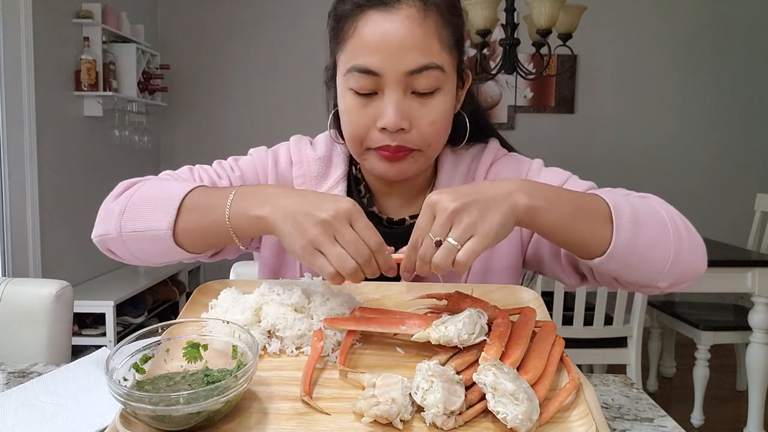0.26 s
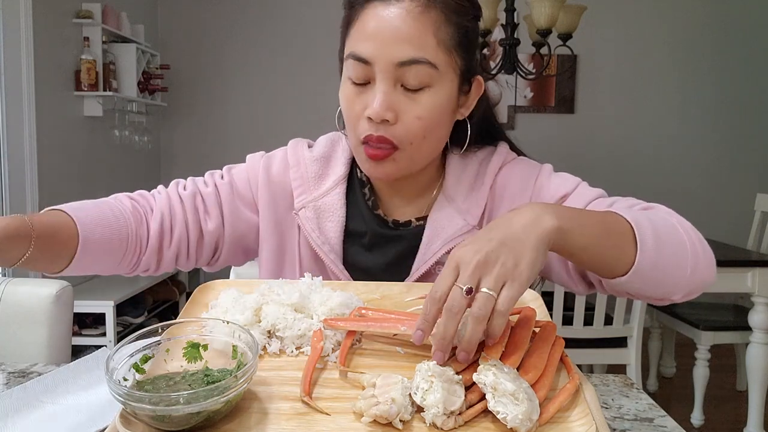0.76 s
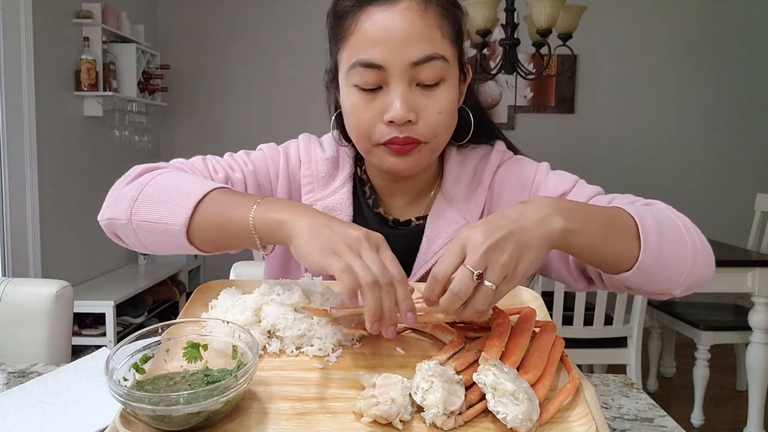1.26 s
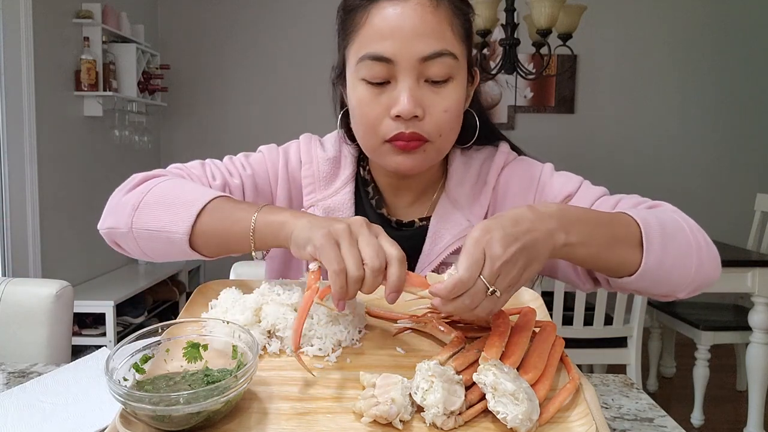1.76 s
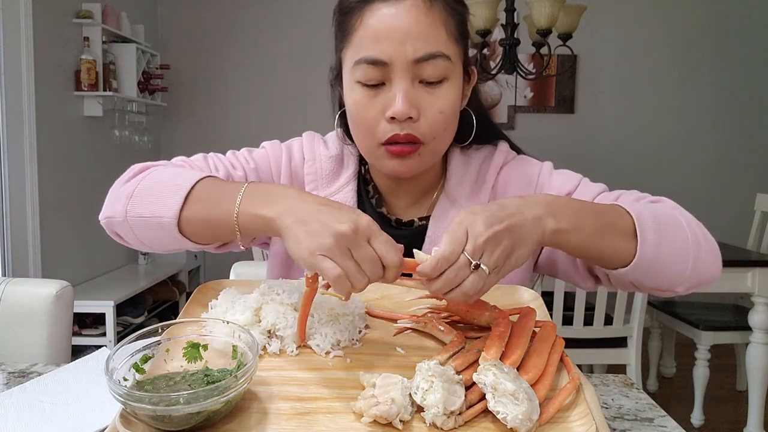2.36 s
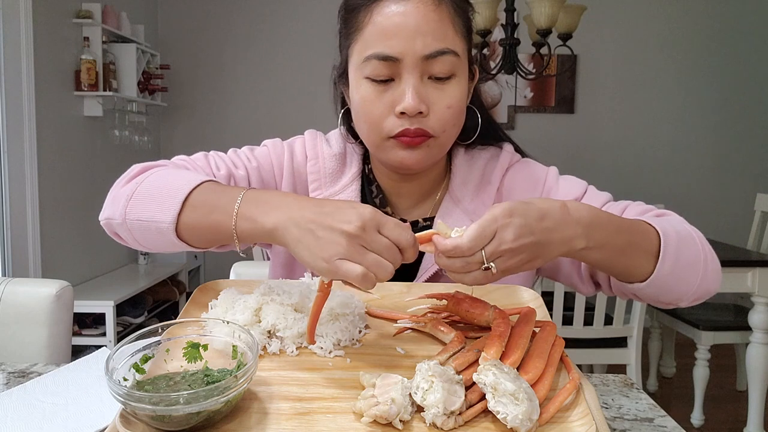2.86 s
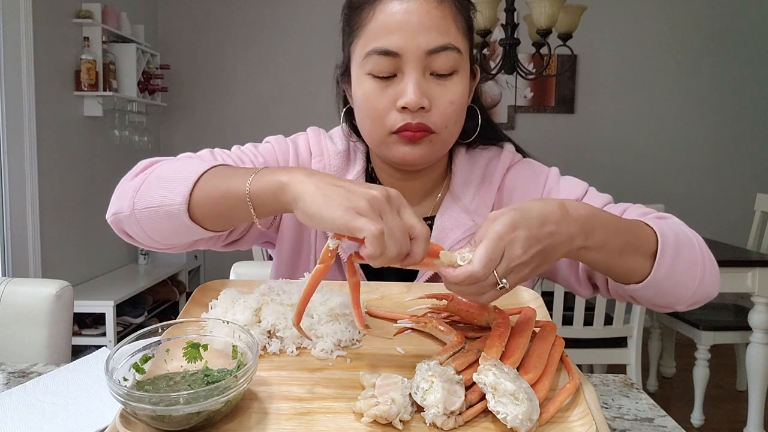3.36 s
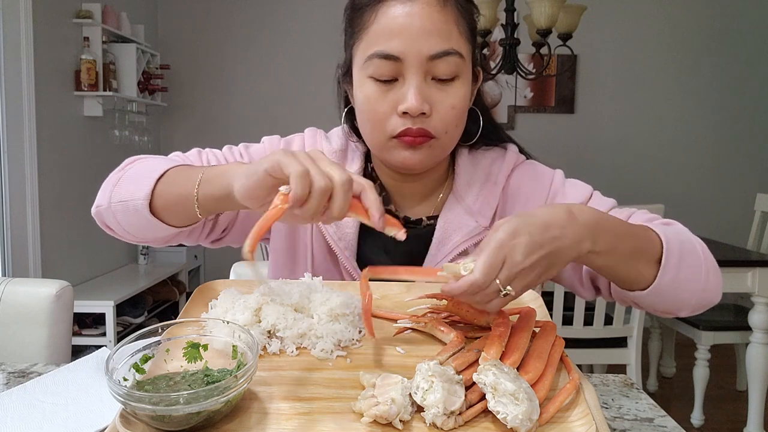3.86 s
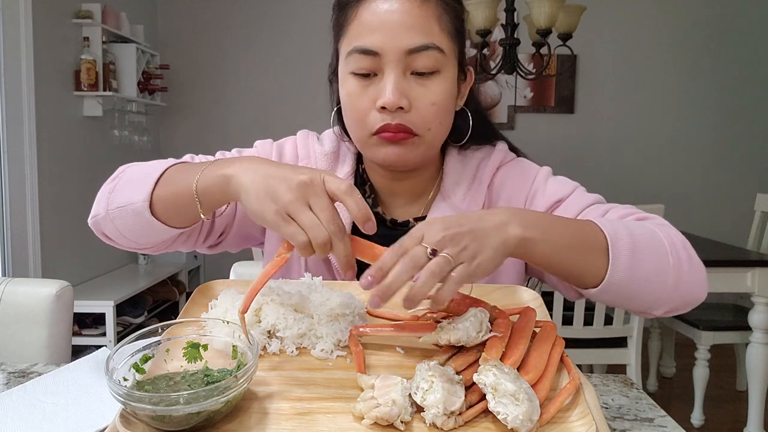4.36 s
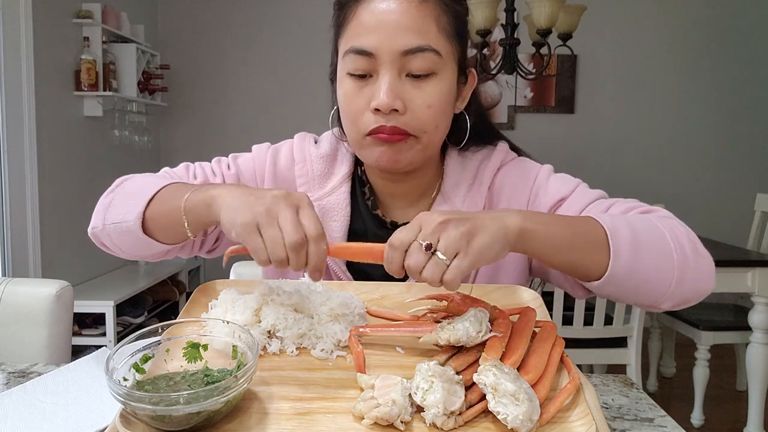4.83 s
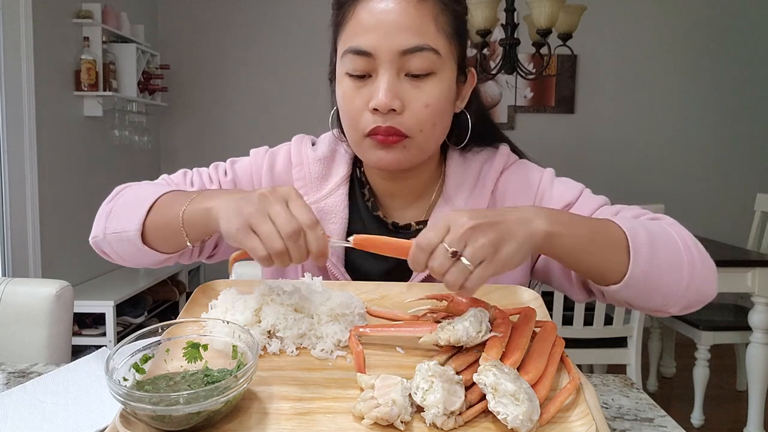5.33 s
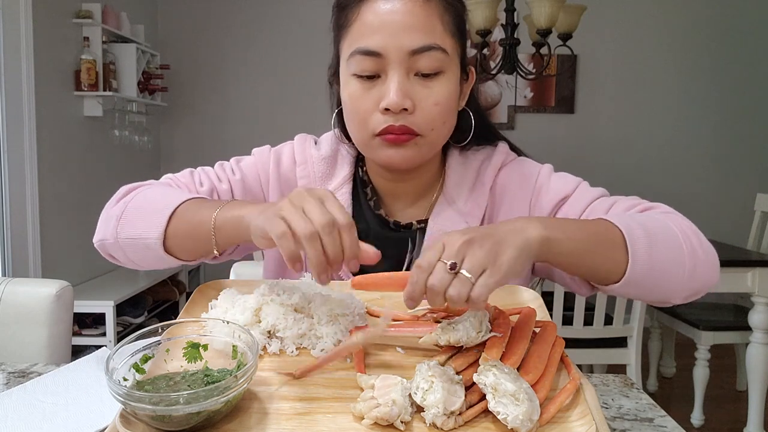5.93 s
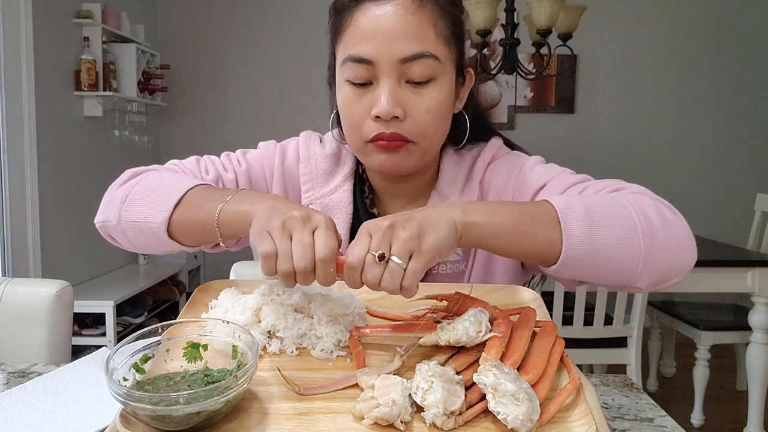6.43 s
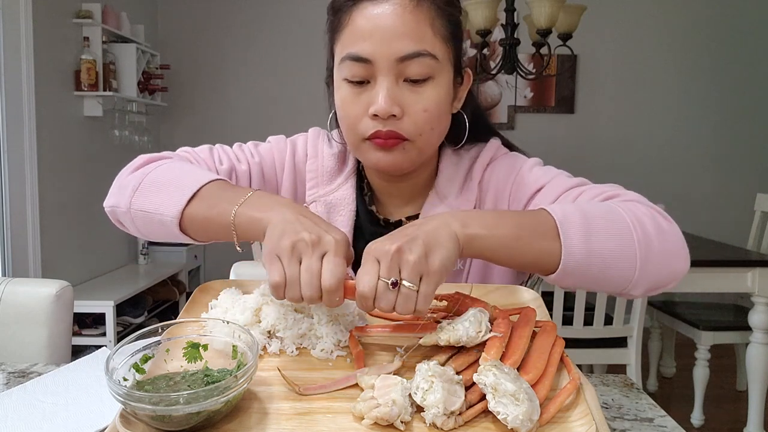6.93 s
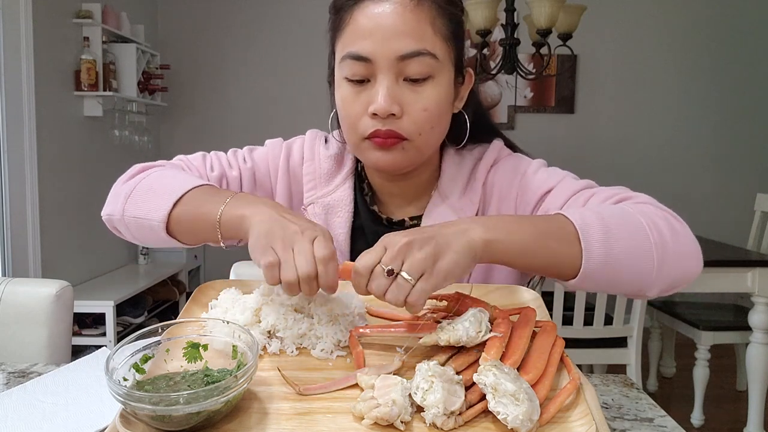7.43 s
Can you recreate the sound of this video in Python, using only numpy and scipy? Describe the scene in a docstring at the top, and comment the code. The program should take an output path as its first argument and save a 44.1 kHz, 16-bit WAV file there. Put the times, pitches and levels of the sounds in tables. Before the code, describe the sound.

A phone near the hands picks up dry, bright shell cracks, short crunches, hollow joint pops and faint finger ticks, with woody thuds and scrapes as pieces meet the board. Events are irregular, with near-silent gaps. A dish tings briefly around one second; the loudest crack comes close to the end. The small hard room adds a short bright reverberation over soft steady rumble.

```python
"""Crab legs snapped over a board

Cooked crab legs are snapped by hand over a wooden board, close to a phone in a quiet dining room.
Shell crunches, cracks, pops and finger ticks are short noise bursts, each with its own colour.
Knocks, scrapes and a ringing dish are decaying modes; short decaying tones colour the loudest snap.
A room built of noise answers them, and shaped noise makes the soft rumble of the house."""
import sys
import numpy as np
from scipy import signal
from scipy.fft import rfft, irfft
from scipy.io import wavfile
from scipy.ndimage import uniform_filter1d

SR = 44100
rng = np.random.default_rng(int(sys.argv[2]) if len(sys.argv) > 2 else 0)


def digitize_waveform(pressure):
    """Quantize a signal to 16-bit integers and store it at the path in sys.argv[1].

    Rows of a 2-D input are taken as channels; values are limited to [-1, 1].
    """
    field = np.atleast_2d(pressure).T
    bounded = np.clip(field, -1, 1)
    quanta = np.round(bounded * 32767).astype(np.int16)
    wavfile.write(sys.argv[1], SR, quanta)


N = 339129  # length of the scene (samples)

# Still air of the house. Each row: frequency in Hz, relative density in dB per Hz.
AIR_COLOUR = [(15, -39.5), (25, -6.5), (55, -5.5), (80, -16), (102, -3), (161, -5), (185, -2.5), (212, -3),
              (344, -7), (394, -6.5), (641, -12), (2690, -31), (3820, -32), (4140, -30.5), (16000, -51)]
# Walls and ceiling. Each row: frequency in Hz, early energy in dB, early T60 in seconds,
# late energy in dB, late T60 in seconds.
ROOM_BANDS = [(150, -6, 0.07, -19, 0.4), (676, -6.5, 0.067, -3, 0.22), (1830, 2.5, 0.078, -7, 0.74),
              (3600, -1, 0.19, -12.5, 0.81), (8600, -6, 0.11, -16, 0.48), (15000, -4.5, .15, -15.5, 0.13)]
# Colour common to all shell. Each row: frequency in Hz, gain in dB.
SHELL_COLOUR = [(30, -27), (100, -21.5), (400, -14.5), (800, -5), (1500, -10.5), (2300, -4), (3100, -1),
                (4400, 0), (5700, 0.5), (6700, -3), (8200, 3), (10500, -7), (15000, -5), (16500, -18.5)]
# Shell tearing or rubbing on shell. Each row: start in seconds, length in seconds, rms level in dB,
# brightness in dB per octave, strength of the hollow's resonance in dB.
CRUNCHES_HEARD = [(0.015, 0.052, -67.5, -10, 7), (0.667, 0.07, -73, -8, 7), (1.921, 0.18, -59, -0.5, 4),
                  (2.092, 0.034, -42.5, -3.5, -0.5), (2.52, .03, -57.5, 4, 5),
                  (3.561, 0.065, -55.5, 3.5, 10), (4.828, .12, -52.5, 2, -4), (5.311, 0.076, -66, -3.5, 18)]
# The board with its load of legs. Each row: mode in Hz, strength in dB, T60 in seconds.
BOARD_MODES = [(64, -10, 0.1), (125.5, -15, 0.077), (209, -13, 0.09), (292, -2, .06), (328.4, -6, 0.1),
               (430, 2, 0.018), (582.2, -1, 0.058), (773, -2.5, .04), (1152, -6, .04), (1384, -1.5, 0.048),
               (1435, -6.5, 0.12), (1970, -4, 0.053), (2074, -0.5, 0.12)]
# Shell meeting the board; at 7.035 s the low thump and body of the big snap. Each row: start in seconds,
# thud energy in dB, favoured pitch in Hz, clack energy in dB.
THUDS_AND_CLACKS = [(0.063, -28.5, 394, -36.5), (.918, -25, 152, -25.5), (1.322, -37, 370, -47),
                    (1.447, -35, 706, -43), (3.959, -44, 396, -30), (3.9971, -21, 373, -24.5),
                    (4.011, -3.5, 315, -5), (4.271, -41, 504, -25.5), (4.2826, -11.5, 250, -42),
                    (4.292, -28, 75.2, -36), (5.903, -21, 920, -24), (5.9541, -29, 496, -28),
                    (5.976, -25.5, 447, -39), (6.0218, -4.5, 400, -18.5), (6.073, -18.5, 694, -35),
                    (7.035, -18, 111, -19), (7.0355, -8, 810, -11.5)]
# Shell giving way, and at 0.92 s the clack of something set down or dropped. Each row: start in seconds,
# energy in dB, lead of the small clicks ahead of it in seconds, resonance in Hz, resonance strength in dB,
# brightness in dB per octave.
CRACKS_AND_CLACK = [(0.873, -35.5, .001, 4970, 7, -6), (0.9192, -12, .002, 3800, 1, -1.5),
                    (1.306, -35.5, .001, 5070, 4, -0.5), (1.7058, -22, 0.0013, 7450, 6.5, -1),
                    (1.7641, -14.5, 0.00073, 7200, 15, -2), (1.781, -16.5, 0.0037, 4200, 6, -1.5),
                    (1.8975, -21, 0.00089, 7450, 8, 2), (1.922, -13, 0.00085, 7630, 4, 5),
                    (1.973, -26.5, 0.0037, 3236, 5, -6.5), (2.1142, -1, 0.015, 4380, 3, 7),
                    (2.538, -26.5, .012, 5540, 29, -1), (2.5484, -22, .001, 5620, 1, 0.5),
                    (2.9521, -22, 0.0039, 4200, -1, -0.5), (3.0786, -12.5, 0.014, 2460, -5.5, 2),
                    (3.596, -22.5, 0.019, 4950, 17.5, -1.5), (3.627, -19, 0.00092, 4700, 2, -4),
                    (4.849, -12.5, 0.0042, 7210, -4, 1.5), (4.855, -21.5, .001, 2290, 4, 3),
                    (4.922, -8, 0.0035, 2910, -6, 5.5), (5.34, -35, .002, 4700, 23, -5.5),
                    (5.9, -9.5, 0.0011, 6430, 10.5, -4), (7.0336, 9.5, 0.00096, 3650, 6.5, 4),
                    (7.0385, 0, 0.00089, 3430, 5.5, -3)]
# Scraps landing in a dish. Each row: start in seconds, ring energy in dB, favoured pitch in Hz.
DISH_DROPS = [(0.917, -16, 2450), (0.9818, -15.5, 4170)]
# The dish. Each row: mode in Hz, strength in dB, T60 in seconds.
DISH_MODES = [(2170, 1, .08), (2290, 6.5, 0.085), (2360, -17, .5), (2444, -1, 0.059), (4020, 5, .06),
              (4114, 10, 0.065), (4210, 12, 0.056), (4310, 11, .07), (4420, 5, .09), (4343, -12, 0.5)]
# Fingers shifting their grip on the shell. Each row: start in seconds, end in seconds.
GRIP_SHIFTS = [(1.36, 1.68), (2.7, 2.94), (3.501, 3.57), (5.32, 5.6), (7.469, 7.5)]
# Hollow segments popping as a joint parts. Each row: start in seconds, energy in dB,
# pitch of the hollow in Hz.
JOINT_POPS = [(1.972, -19.5, 2124), (2.2405, -27.5, 2060), (3.578, -34, 2400), (3.597, -24.5, 2380),
              (3.6268, -21.5, 2180), (4.852, -25.5, 2133)]
# Shell dragged over the board. Each row: start in seconds, length in seconds, rms level in dB,
# favoured pitch in Hz.
BOARD_SCRAPES = [(2.131, .046, -53, 482.7), (4.029, 0.077, -50, 590), (4.198, 0.087, -53, 570),
                 (4.273, .04, -44, 312), (4.582, 0.21, -70, 362), (5.92, 0.15, -56, 475),
                 (6.029, 0.17, -58.5, 560)]
# Fine colour of the loudest snap: short decaying tones, mostly 3 to 5 kHz.
# Each row: tone in Hz, strength in dB, T60 in seconds.
SNAP_TONES = [(3040, -8.5, .06), (3170, -2.5, .05), (3370, 2, 0.095), (3516, 3.5, 0.053), (3500, -1, 0.043),
              (3780, -7, .05), (4300, 1, 0.025), (4830, -1, .05), (4980, -3.5, 0.028), (5060, 4.5, 0.1),
              (4970, -1.5, 0.074), (5330, -7, 0.047), (8500, -3, 0.027)]

AIR_DB = -69  # rms of the rumble, left and right averaged
TOP_HZ = 16500
GRAIN_SIZE, PORT_LAG = 4096, 2  # length of one crack, lead of the left microphone port (samples)
SLIPS_PER_S = 1100
# two small clicks run ahead of each crack, the second nearer to it and slightly weaker
SPLINTER_COUNT, SPLINTER_DB, SPLINTER_STEP_DB, SPLINTER_CLOSING = 2, -14, -0.5, .7
POP_Q, POP_LEAK_DB = 4.5, -34
# every clack in the thud table has the same dull shell colour, and its hard edge rings upper board modes
CLACK_HZ, CLACK_RING_DB, CLACK_TILT_DB = 6800, 3.5, -8.5
EDGE_HZ, EDGE_DB = 1900, -4.5  # EDGE_DB is relative to the clack
TICKS_PER_S, TICK_DB, TICK_SPREAD_DB, TICK_HZ = 9, -46, 7.5, 5207
DROP_CLICK_DB = -6.5  # the scrap's own click, against the ring of the dish
SNAP_S, SNAP_TONES_DB = 7.034, 3  # when the loudest snap's tones start, and their energy together
# what each source sends to the room, against its straight sound (dB)
SHELL_ROOM_DB, BOARD_ROOM_DB, DISH_ROOM_DB, SNAP_ROOM_DB = 3, -1.5, 2, -7


def undb(db):
    """Decibels to gain."""
    return 10 ** (np.asarray(db) / 20)


def unit(x):
    """Scale to an energy of one in each channel."""
    return x / np.sqrt(np.sum(x ** 2, axis=-1, keepdims=True))


def decay(t, t60):
    """Exponential decay that falls by 60 dB in t60 seconds."""
    return np.exp(-np.log(1000) * t / t60)


def freqs(size):
    """Frequencies of the bins of a spectrum, kept above zero."""
    return np.maximum(np.fft.rfftfreq(size, 1 / SR), 1)


def curve(points, hz):
    """Read (Hz, value) points on a log-frequency axis."""
    f, value = np.transpose(points)
    return np.interp(np.log(hz), np.log(f), value)


def causal(gain):
    """The frequency response with this gain that rings after a blow, never before."""
    cepstrum = irfft(np.log(gain + 1e-9))
    half = len(cepstrum) // 2
    cepstrum[1:half] *= 2
    cepstrum[half + 1:] = 0
    return np.exp(rfft(cepstrum))


def resonance(hz, centre_hz, q):
    """Response of a simple resonator, with a gain of one at its centre."""
    return 1 / (1 + 1j * q * (hz / centre_hz - centre_hz / hz))


def add(out, s, x):
    """Mix a sound in at time s."""
    start = max(int(s * SR), 0)
    out[:, start:start + x.shape[-1]] += x[..., :N - start]


def pair(size, likeness):
    """Left and right noise that are partly alike."""
    shared = np.sqrt(likeness) * rng.standard_normal(size)
    return shared + np.sqrt(1 - likeness) * rng.standard_normal((2, size))


def even(x, size):
    """Level the broad humps of a random burst's spectrum and keep its fine ripple."""
    spectrum = rfft(x)
    power = uniform_filter1d(np.abs(spectrum) ** 2, size, axis=-1)
    return spectrum * np.array([causal(np.maximum(p, 1e-12) ** -.5) for p in power])


def spread(mid, side, hz, apart_hz):
    """Left and right spectra: long waves reach both ports more alike than short ones."""
    side = side * np.minimum(0.28 + hz / apart_hz, 1)
    return np.array([mid + side, mid - side])


def air():
    """Soft steady rumble of the house: wide noise shaped by the colour of the air."""
    hz = freqs(N)
    mid, side = rfft(rng.standard_normal((2, N)))
    noise = irfft(spread(mid, side, hz, apart_hz=1530) * undb(curve(AIR_COLOUR, hz)), N)
    return noise * undb(AIR_DB) / np.std(noise.mean(axis=0))


def room(first_s=0.0037):
    """Surfaces answer after a few milliseconds: early and late noise decays, set band by band."""
    size = 2 ** 15
    t, hz = np.arange(size) / SR, freqs(size)
    mid, side = even(rng.standard_normal((2, size)), size=200) * np.sqrt(size)
    noise = spread(mid, side, hz, apart_hz=1800)
    log_centres = np.log(np.array(ROOM_BANDS)[:, 0])
    out = np.zeros((2, size))
    for share, (_, early_db, early_t60, late_db, late_t60) in zip(np.eye(len(ROOM_BANDS)), ROOM_BANDS):
        weight = np.interp(np.log(hz), log_centres, share)  # neighbouring bands crossfade
        band = irfft(noise * weight) / np.sqrt(2)
        early = undb(early_db) * unit(decay(t, early_t60))
        late = undb(late_db) * unit(decay(t, late_t60))
        out += band * np.hypot(early, late)
    return np.pad(out, ((0, 0), (int(first_s * SR), 0)))


def piece(ring_hz, ring_db, tilt_db):
    """Response of one piece of shell: thin pieces are bright, wet ones dull, and each has a resonance."""
    hz = freqs(GRAIN_SIZE)
    tilt = tilt_db * np.log2(np.clip(hz, 1000, TOP_HZ) / 4000)
    colour = undb(curve(SHELL_COLOUR, hz) + tilt)
    # only the size of Q shapes the gain: the resonance is broadest near 9 dB and narrows either side
    q = 4.7 - 0.5 * max(ring_db, 0)
    return causal(colour * np.abs(1 + undb(ring_db) * resonance(hz, ring_hz, q)))


def crack(response, run_s=.0012, after_db=-17, after_s=0.003, likeness=0.46):
    """A fracture runs through the shell in about two milliseconds, with a faint splintery tail."""
    t = np.arange(GRAIN_SIZE) / SR
    envelope = np.sqrt(t) * (np.exp(-(t / run_s) ** 2) + undb(after_db) * np.exp(-t / after_s))
    burst = even(pair(GRAIN_SIZE, likeness) * envelope, size=90)
    return unit(irfft(burst * response))


def slips(length_s, spread_db):
    """Random tiny slips of unequal size that swell and die away."""
    size = int(length_s * SR)
    happens = rng.random(size) < SLIPS_PER_S / SR
    happens[size // 2] = True  # at least one slip
    strength = rng.standard_normal(size) * undb(spread_db * rng.standard_normal(size))
    return happens * strength * np.sqrt(np.hanning(size))


def rubbed(length_s, spread_db, grain):
    """Repeat a grain at every slip, at an rms of about one over the stated length."""
    fibres = slips(length_s, spread_db)
    return unit(signal.fftconvolve(fibres[None], grain)) * np.sqrt(length_s * SR)


def struck(modes, favoured_hz, q, scatter, reach):
    """Decaying tones, those within a factor `reach` of one pitch favoured, as a contact's softness does."""
    t = np.arange(int(.7 * SR)) / SR
    out = np.zeros((2, len(t)))
    for hz, db, t60 in modes:
        hz = hz * (1 + scatter * rng.standard_normal())
        lag = rng.standard_normal((2, 1)) * min(hz / 3000, 1)  # high tones reach the two ports out of step
        size = undb(db) * np.abs(resonance(favoured_hz, hz, q)) ** 2
        sign = rng.choice([-1, 1])  # each tone starts either way up
        out += sign * size * np.cos(2 * np.pi * hz * t + lag) * decay(t, t60)
    edges = [favoured_hz / reach, min(favoured_hz * reach, TOP_HZ)]
    contact = signal.butter(2, edges, "band", fs=SR, output="sos")
    return unit(signal.sosfilt(contact, out))


def shell_hit(s, db, response, gathered_db=3):
    """One click as (s, straight, to the room); the room gathers it from all sides, smoothing its spectrum."""
    sound = crack(response)
    smooth = unit(irfft(response))
    gathered = unit(sound + undb(gathered_db) * smooth)
    return s, undb(db) * sound, undb(db + SHELL_ROOM_DB) * gathered


def placed(s, db, sound, room_db):
    """Any other sound as (s, straight, to the room)."""
    return s, undb(db) * sound, undb(db + room_db) * sound


def crunching():
    """Twisted or rubbed shell gives way in many tiny slips, each a small crack."""
    for s, length_s, db, tilt_db, hollow_db in CRUNCHES_HEARD:
        grain = crack(piece(1500, hollow_db, tilt_db))
        yield placed(s, db, rubbed(length_s, spread_db=4, grain=grain), room_db=0)


def thudding_and_clacking():
    """Pieces thud and clack on the board; the same modes and click give the big snap its thump and body."""
    clack = piece(CLACK_HZ, CLACK_RING_DB, CLACK_TILT_DB)
    for s, thud_db, hz, clack_db in THUDS_AND_CLACKS:
        for db, favoured_hz in ((thud_db, hz), (clack_db + EDGE_DB, EDGE_HZ)):
            board = struck(BOARD_MODES, favoured_hz, q=0.35, scatter=0.028, reach=2.6)
            yield placed(s, db, board, BOARD_ROOM_DB)
        yield shell_hit(s, clack_db, clack)


def cracking():
    """Bent shell splinters, then cracks in its own colour; one clack of a set-down is made the same way."""
    for s, db, lead_s, ring_hz, ring_db, tilt_db in CRACKS_AND_CLACK:
        response = piece(ring_hz, ring_db, tilt_db)
        for k in range(SPLINTER_COUNT):
            splinter_s = s - lead_s * SPLINTER_CLOSING ** k
            yield shell_hit(splinter_s, db + SPLINTER_DB + k * SPLINTER_STEP_DB, response)
        yield shell_hit(s, db, response)


def dropping():
    """Scraps click as they land and ring the modes of the dish."""
    for s, db, hz in DISH_DROPS:
        yield shell_hit(s, db + DROP_CLICK_DB, piece(hz, ring_db=30, tilt_db=-4))
        dish = struck(DISH_MODES, hz, q=1.0, scatter=0.00063, reach=3.0)
        yield placed(s, db, dish, DISH_ROOM_DB)


def fingering():
    """Handled shell ticks faintly at random moments."""
    tick = piece(TICK_HZ, ring_db=9, tilt_db=-2.5)
    for start_s, end_s in GRIP_SHIFTS:
        length_s = end_s - start_s
        count = int(np.ceil(TICKS_PER_S * length_s))
        for moment, size in rng.random((count, 2)):
            yield shell_hit(start_s + moment * length_s, TICK_DB + TICK_SPREAD_DB * (2 * size - 1), tick)


def popping():
    """A hollow segment resonates in a short pop as its joint parts."""
    for s, db, hz in JOINT_POPS:
        hollow = np.abs(resonance(freqs(GRAIN_SIZE), hz, POP_Q)) ** 2 + undb(POP_LEAK_DB)
        yield shell_hit(s, db, causal(hollow))


def scraping():
    """Shell sticks and slips on the wood and keeps the board sounding."""
    for s, length_s, db, hz in BOARD_SCRAPES:
        board = struck(BOARD_MODES, hz, q=1.0, scatter=0.036, reach=3.3)
        yield placed(s, db, rubbed(length_s, spread_db=1.0, grain=board), BOARD_ROOM_DB)


def snap_colour():
    """Short decaying tones, mostly 3 to 5 kHz, give the loudest snap its fine colour."""
    tones = struck(SNAP_TONES, 3800, q=0.27, scatter=.001, reach=2.0)
    yield placed(SNAP_S, SNAP_TONES_DB, tones, SNAP_ROOM_DB)


def scene(left_db=0.35):
    """Every handled sound reaches the phone straight and by way of the room, over the house rumble."""
    house, walls = air(), room()
    direct, to_room = np.zeros((2, N)), np.zeros((2, N))
    sources = (crunching, thudding_and_clacking, cracking, dropping,
               fingering, popping, scraping, snap_colour)
    for source in sources:
        for s, straight, sent in source():
            add(direct, s, straight)
            add(to_room, s, sent)
    direct[1] = np.roll(direct[1], PORT_LAG)  # the hands are a little nearer the left port
    echo = signal.fftconvolve(to_room, walls, axes=1)[:, :N]
    return (direct + echo) * undb([[left_db], [-left_db]]) + house


def record(dry):
    """The phone rounds the tallest peaks and cuts the top."""
    rounded = np.tanh(dry)
    low_pass = signal.ellip(8, .2, 70, TOP_HZ, fs=SR, output="sos")
    return signal.sosfilt(low_pass, rounded)


dry = scene()
out = record(dry)
digitize_waveform(out)
```